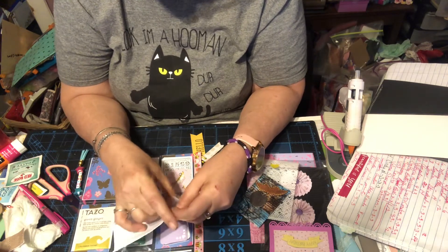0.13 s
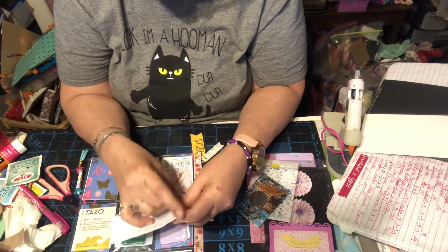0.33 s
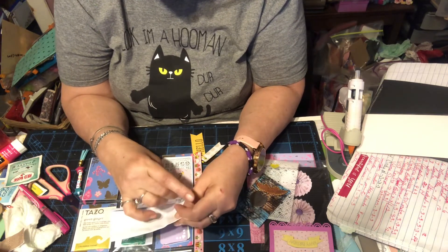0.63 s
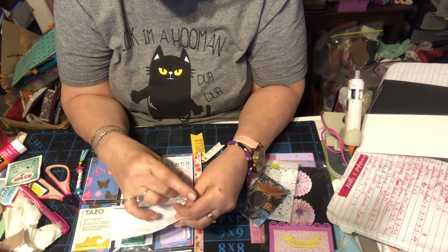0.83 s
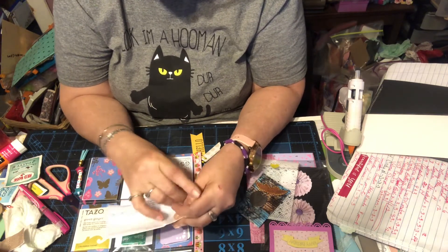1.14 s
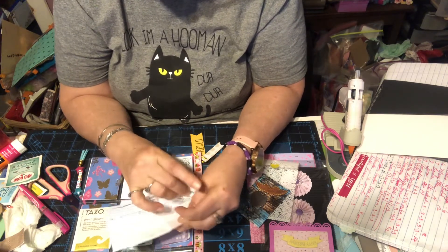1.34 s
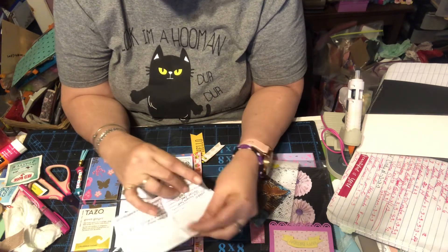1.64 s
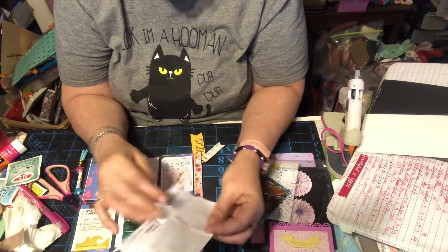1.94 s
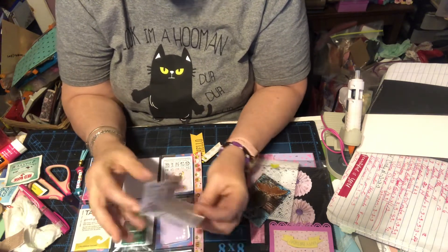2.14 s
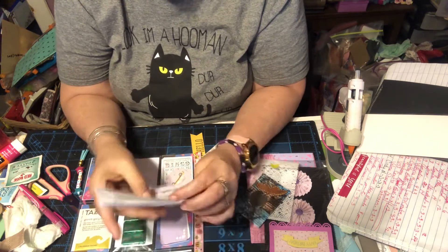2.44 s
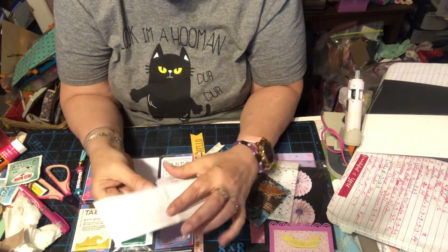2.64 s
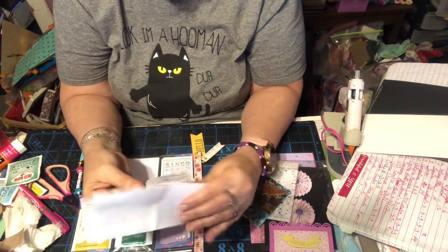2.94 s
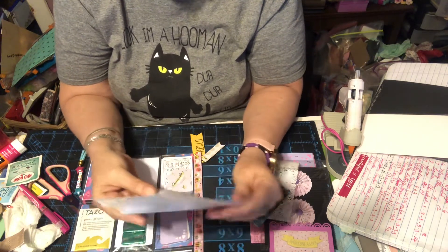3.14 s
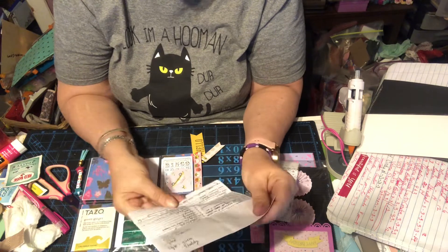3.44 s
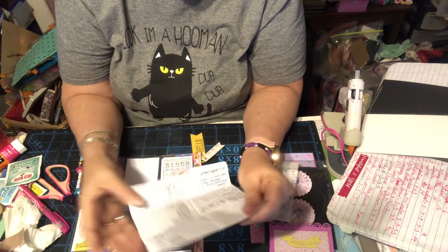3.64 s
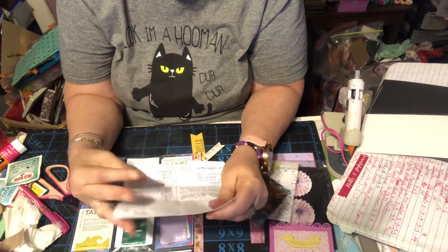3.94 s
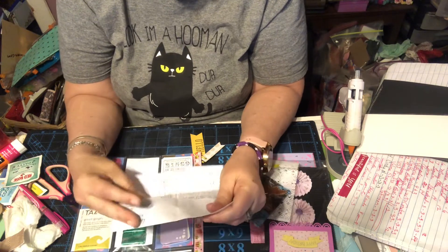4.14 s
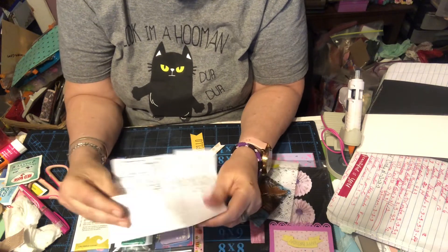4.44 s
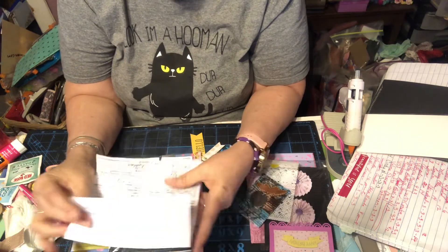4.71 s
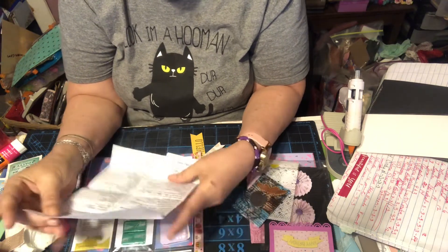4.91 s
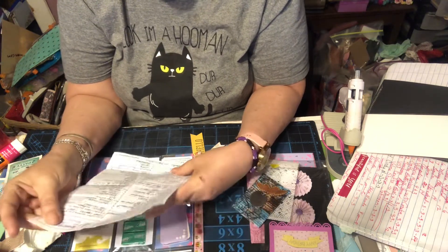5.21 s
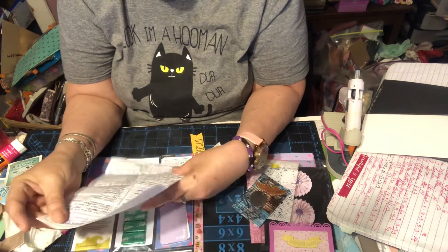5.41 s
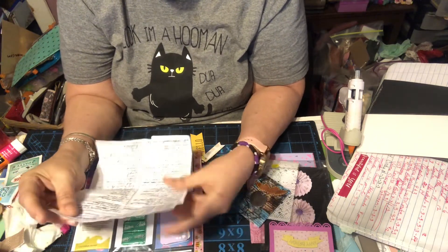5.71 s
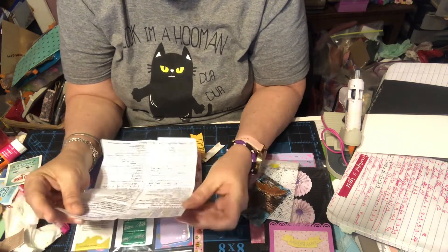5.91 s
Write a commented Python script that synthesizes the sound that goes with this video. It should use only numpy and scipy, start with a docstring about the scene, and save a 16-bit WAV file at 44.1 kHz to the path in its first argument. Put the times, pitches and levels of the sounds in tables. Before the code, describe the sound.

Close to the microphone, hands unfold a sheet of writing paper. Sharp creases snap at once, with isolated clicks, then a dense crackling flurry just after one second. Dry sliding strokes and fine hissy rubbing fill the gaps, pausing briefly before four seconds and resuming until nearly six. The small furnished room is quiet and dry, with soft dark air noise and a very faint distant engine.

```python
"""A folded sheet of writing paper is opened by hand over a craft table in a small furnished room.
From the start creases snap, thickly after 1.3 s: each a pulse and scattered noise ringing a paper panel.
Strokes and light finger rubbing hiss and crackle between snaps: coloured noise in stick-slip bursts.
The rubbing pauses near 3.7 s, then resumes; the last stroke fades just before 6 s.
Throughout, soft noise is the room air; a far engine, two sines and a boom, speeds up to 4.7 s, then eases."""
import sys
import numpy as np
from scipy import signal
from scipy.fft import rfft, irfft, next_fast_len
from scipy.io import wavfile
from scipy.ndimage import uniform_filter1d

SR = 44100
rng = np.random.default_rng(int(sys.argv[2]) if len(sys.argv) > 2 else 0)


def to_wav(s):
    """Save 16-bit WAV."""
    ch = np.atleast_2d(s).T  # columns
    pcm = np.round(np.clip(ch, -1, 1) * 32767)  # PCM
    wavfile.write(sys.argv[1], SR, pcm.astype(np.int16))


N = 267378


def from_db(db):
    """Decibels to gain."""
    return 10 ** (np.asarray(db) / 20)


def rms_one(x):
    """Scale to unit rms."""
    return x / np.sqrt(np.mean(x ** 2) + 1e-20)


def in_time(rows):
    """Interpolate each column after the time column, sample by sample."""
    time_s, *columns = np.transpose(rows)
    return [np.interp(np.arange(N) / SR, time_s, column) for column in columns]


def at_hz(points, hz):
    """Read a table on a log-frequency axis."""
    point_hz, value = np.transpose(points)
    return np.interp(np.log(hz + 1), np.log(point_hz), value)


def coloured(x, spectrum):
    """Filter a steady signal to a spectrum shape; rms 1."""
    size = next_fast_len(N)
    hz = np.fft.rfftfreq(size, 1 / SR)
    shaped = rfft(x, size) * from_db(at_hz(spectrum, hz))
    return rms_one(irfft(shaped, size)[:N])


def drift(rate_hz):
    """Smooth random curve, rms 1, with rate_hz random knots a second."""
    knots = rng.standard_normal(N // 20)
    return rms_one(np.interp(np.arange(N) / SR * rate_hz, np.arange(len(knots)), knots))


def resonate(x, hz, width_hz):
    """Two-pole resonance with gain 1 at its top."""
    r = np.exp(-np.pi * width_hz / SR)
    numerator = np.array([1, 0, -1]) * (1 - r * r) / 2
    denominator = [1, -2 * r * np.cos(2 * np.pi * hz / SR), r * r]
    return signal.lfilter(numerator, denominator, x)


# far engine: time_s, firing_hz, level_db
ENGINE_RUN = [(0, 91.5, -82.5), (1.3, 85.85, -77), (3.5, 94.95, -66.5), (4.15, 93.9, -62),
              (4.7, 125.5, -61.5), (5.15, 121, -65.5), (5.6, 101, -61), (6.06, 89.8, -55.5)]
# engine boom in the room: time_s, level_db
ENGINE_BOOM = [(0, -85), (1.7, -64.5), (3.0, -60.5), (3.8, -58), (5.0, -60.5), (5.6, -66.5)]


def engine(waver=0.017, flutter_db=0.5, first_db=-7.0, boom_hz=146, boom_width_hz=28):
    """Only the two lowest firing orders and a narrow boom get through the walls."""
    firing_hz, level_db = in_time(ENGINE_RUN)
    boom_db, = in_time(ENGINE_BOOM)
    phase = 2 * np.pi * np.cumsum(firing_hz * (1 + waver * drift(20))) / SR
    first = np.sin(phase) * from_db(first_db + flutter_db * drift(22))
    second = np.sin(2 * phase) * from_db(flutter_db * drift(13))
    boom = resonate(rng.standard_normal(N), boom_hz, boom_width_hz)
    boom = resonate(boom, boom_hz, boom_width_hz)
    return from_db(level_db) * rms_one(first + second) + from_db(boom_db) * rms_one(boom)


# still room air, relative density: freq_hz, density_db_per_hz
AIR_SPECTRUM = [(22, -64), (45, -12.5), (90, 2.5), (125, -2.5), (180, 1.5), (450, -8.5), (850, -17.5),
                (1300, -20.5), (2200, -25), (15500, -37.5)]
# narrow resonances of the room air: freq_hz, width_hz, peak_gain_db
AIR_RESONANCES = [(490, 12, 9), (836, 79, 9), (1260, 36, 10)]


def room_air(floor_db=-60):
    """A soft, dark noise floor with a few faint resonances."""
    air = coloured(rng.standard_normal(N), AIR_SPECTRUM)
    resonances = sum((from_db(gain_db) - 1) * resonate(air, hz, width_hz)
                     for hz, width_hz, gain_db in AIR_RESONANCES)
    return from_db(floor_db) * (air + resonances)


# room reverberation: freq_hz, t60_s
ROOM_DECAY = [(200, 0.11), (6000, 0.13), (15000, 0.25)]


def room(x, wet_db=-17.0, full_after_s=0.0065, band_count=8):
    """Diffuse reflections from the clutter: noise bands, each with its own exponential decay."""
    t = np.arange(SR // 2) / SR
    edges_hz = np.geomspace(150, 17000, band_count + 1)
    tail = 0
    for low_hz, high_hz in zip(edges_hz, edges_hz[1:]):
        bandpass = signal.butter(2, [low_hz, high_hz], "band", fs=SR, output="sos")
        band = signal.sosfilt(bandpass, rng.standard_normal(len(t)))
        t60_s = at_hz(ROOM_DECAY, np.sqrt(low_hz * high_hz))
        tail = tail + band * np.exp(-np.log(1000) * t / t60_s)
    # silent for half of full_after_s, then ramps up
    tail = tail * np.clip(2 * t / full_after_s - 1, 0, 1)
    return from_db(wet_db) * signal.fftconvolve(x, tail / np.linalg.norm(tail))[:N]


# light rubbing while the fingers hold and turn the sheet: start_s, end_s, rustle_db, hiss_db
GRIP_RUBS = [(0, 0.71, -66.5, -65.5), (0.97, 2.11, -66.5, -72), (2.23, 2.605, -63, -68.5),
             (2.604, 3.634, -65.5, -64), (3.985, 4.804, -64.5, -66.5), (4.839, 5.763, -63, -64)]
# paper sliding on paper and skin: start_s, length_s, rustle_db, hiss_db
SLIDE_STROKES = [(-0.03, 0.11, -49, -42.5), (0.125, 0.041, -51.5, -51.5), (0.36, 0.11, -51.5, -51),
                 (0.53, 0.12, -64, -55), (0.723, 0.05, -61, -46), (0.802, 0.055, -68.5, -68),
                 (0.86, 0.086, -54, -57), (0.984, 0.11, -52, -50.5), (1.091, 0.048, -54, -59.5),
                 (1.149, 0.038, -58, -54.5), (1.209, 0.12, -55.5, -49), (1.248, 0.13, -45, -41),
                 (1.363, 0.107, -48.5, -53.5), (1.587, 0.35, -54.5, -52.5), (1.912, 0.087, -48, -51),
                 (2.024, 0.04, -53.5, -49), (2.153, 0.023, -55, -59), (2.23, 0.05, -60, -58),
                 (2.272, 0.051, -60, -42), (2.346, 0.045, -51.5, -44), (2.387, 0.051, -49.5, -55.5),
                 (2.472, 0.09, -58, -60.5), (2.618, 0.21, -64, -58.5), (2.774, 0.15, -56.5, -51.5),
                 (2.974, 0.17, -57, -56.5), (3.115, 0.23, -53, -58), (3.218, 0.15, -50.5, -49),
                 (3.412, 0.11, -58.5, -62), (3.995, 0.093, -62.5, -66.5), (4.08, 0.18, -60, -57),
                 (4.208, 0.3, -59, -51), (4.423, 0.15, -51.5, -51.5), (4.561, 0.28, -52.5, -49.5),
                 (4.836, 0.17, -60, -57), (4.95, 0.43, -58, -61), (5.44, 0.15, -51.5, -56.5),
                 (5.464, 0.298, -65.5, -62.5), (5.66, 0.28, -66.5, -72)]


def hand_motion(grip_fade_s=0.03, arch_power=1.1):
    """Rustle and hiss gains: half-sine arched strokes add in power to the light rub of the grip."""
    t = np.arange(N) / SR
    power = np.zeros((2, N))
    for start_s, end_s, rustle_db, hiss_db in GRIP_RUBS:
        held = np.clip(np.minimum(t - start_s, end_s - t) / grip_fade_s, 0, 1)
        power += np.outer(from_db([rustle_db, hiss_db]), held) ** 2
    for start_s, length_s, rustle_db, hiss_db in SLIDE_STROKES:
        during = slice(*np.searchsorted(t, [start_s, start_s + length_s]))
        arch = np.abs(np.sin(np.pi * (t[during] - start_s) / length_s)) ** arch_power
        power[:, during] += np.outer(from_db([rustle_db, hiss_db]), arch) ** 2
    return np.sqrt(power)


def slips(median_per_s, spread_db, die_s, smooth, clump_db):
    """Friction noise: clumps of tiny stick-slip bursts of uneven size over an even rub."""
    sizes = from_db(spread_db * np.minimum(rng.exponential(1, N), 3.0))
    caught = rng.random(N) < median_per_s * from_db(clump_db * drift(30)) / SR
    bursts = (sizes * caught) ** 2 + 1e-18
    power = signal.lfilter([1], [1, -np.exp(-2 / (die_s * SR))], bursts)
    return rng.standard_normal(N) * np.sqrt(smooth + power / power.mean())


def table_echo(x, lag_s=0.0025, sway=0.024, echo_db=-10.0):
    """The table top throws the rustle back; the path changes a little as the sheet moves."""
    n = np.arange(N)
    lag_samples = lag_s * SR * (1 + sway * drift(1.0))
    return from_db(echo_db) * np.interp(n - lag_samples, n, x)


# rustling sheet, relative density: freq_hz, density_db_per_hz
RUSTLE_SPECTRUM = [(150, -9.5), (350, 3.5), (850, 3.5), (1400, 1.5), (3800, -4), (5500, -23), (9000, -58)]
# rubbing fibres, relative density: freq_hz, density_db_per_hz
FIBRE_SPECTRUM = [(1500, -18), (3000, 0.5), (4300, 0.5), (6000, -3.5), (7800, 1), (8800, -7), (10500, -4),
                  (15500, -3.5)]


def sliding(rustle_gain, hiss_gain):
    """Coarse catches shake the whole sheet; the fibres add a fine hiss with tiny ticks."""
    catches = slips(median_per_s=110, spread_db=2.0, die_s=0.003, smooth=0.23, clump_db=5)
    rustle = coloured(catches, RUSTLE_SPECTRUM)
    fine = slips(median_per_s=510, spread_db=3.5, die_s=0.00061, smooth=0.57, clump_db=14.0)
    hiss = coloured(fine, FIBRE_SPECTRUM)
    return rustle_gain * (rustle + table_echo(rustle)) + hiss_gain * hiss


def bending_waves(noise, die_s, rise=.5, pulse=1.4, linger_db=-27, linger_s=0.0045, smooth_bins=162):
    """Spectrum of one buckle: a clean pulse, waves scattered by folds and edges, a weak part that lingers."""
    t = np.arange(len(noise)) / SR
    attack = 1 - np.exp(-t / (rise * die_s))
    decay = np.exp(-t / die_s) + from_db(linger_db) * np.exp(-t / linger_s)
    burst = noise * attack * decay
    burst[round(rise * die_s * SR)] += pulse
    waves = rfft(burst)
    # keep the fine ripple of scattering, even out the energy overall
    return waves / np.sqrt(uniform_filter1d(np.abs(waves) ** 2, size=smooth_bins) + 1e-12)


# a panel that dies away sooner radiates less bass: its low edge rises by a power law
TYPICAL_DIE_S, LOW_EDGE_HZ, LOW_EDGE_LAW = 0.0036, 490, 0.63
PANEL_DB, PANEL_REL_WIDTH = 9, 0.25
PANEL_BUILD_S = 0.00023   # a crack shorter than this hardly rings the panel
# colour shared by all snaps: freq_hz, gain_db
SHEET_COLOUR = [(150, 12), (400, 2.5), (7200, 0), (8800, -1.5), (10500, -1), (15500, 1.5)]


def buckle(noise, die_s, panel_hz, top_hz, travel_s=0.00066):
    """One buckle rings the panel next to it; panels that die away sooner lack bass, blunt creases treble."""
    hz = np.fft.rfftfreq(len(noise), 1 / SR)
    die_s = max(die_s, 1e-4)
    low_hz = LOW_EDGE_HZ * (TYPICAL_DIE_S / die_s) ** LOW_EDGE_LAW
    ring_db = PANEL_DB * (1 - np.exp(-(die_s / PANEL_BUILD_S) ** 2))
    low, top, panel = 1j * hz / low_hz, 1j * hz / top_hz, 1j * hz / panel_hz
    radiation = low * low * low / ((1 + low) * (1 + low + low * low))
    damping = PANEL_REL_WIDTH * panel
    resonance = 1 + (from_db(ring_db) - 1) * damping / (1 + damping + panel * panel)
    # bending waves: delay = travel_s * (sqrt(1000 / hz) - 1), lows last
    dispersion = np.exp(-2j * np.pi * travel_s * (2 * np.sqrt(1000 * hz) - hz))
    colour = from_db(at_hz(SHEET_COLOUR, hz)) * dispersion
    return irfft(bending_waves(noise, die_s) * radiation * resonance * colour / (1 + top) ** 2)


def snaps(rows, size=4096, lead_count=256):
    """Sum one buckle per row: start_s, level_db, die_s, panel_hz, top_hz."""
    out = np.zeros(N + 2 * size)
    noises = rng.standard_normal((len(rows), size))
    for (start_s, level_db, die_s, panel_hz, top_hz), noise in zip(rows, noises):
        at = max(round(start_s * SR), 0)
        # the lead keeps early treble from wrapping to the end
        snap = np.roll(buckle(noise, die_s, panel_hz, top_hz), lead_count)
        out[at:at + size] += from_db(level_db) * snap
    return out[lead_count:lead_count + N]


TICKS_PER_S, TICK_OVER_RUSTLE_DB, TICK_SPREAD_DB = 22, 26, 0.5
TICK_DIE_S, TICK_PANEL_HZ, TICK_TOP_HZ = 0.002, 2000, 5500   # medians


def small_creases(push, spread_octaves=0.5, count=1200):
    """Random weak buckles from a stock of creases: the push on the sheet sets their chance and strength."""
    at, chance = rng.integers(0, N, count), rng.random(count)
    own = rng.standard_normal((count, 4))
    rate_per_s = TICKS_PER_S * push[at] / push.mean()
    push_db = 20 * np.log10(push[at] + 1e-9)
    level_db = push_db + TICK_OVER_RUSTLE_DB + TICK_SPREAD_DB * own[:, 0]
    shapes = np.array([TICK_DIE_S, TICK_PANEL_HZ, TICK_TOP_HZ]) * 2 ** (spread_octaves * own[:, 1:])
    rows = np.column_stack([at / SR, level_db, shapes])
    return snaps(rows[chance < rate_per_s * N / SR / count])


# creases snapping at set times, from loud cracks to tiny ticks:
# start_s, level_db, die_s, panel_hz, top_hz
TIMED_CREASES = [(0.017, -5.5, 0.0023, 4920, 16000), (0.031, -6, 0.0024, 1056, 3370),
                 (0.044, -3, 0.0036, 1990, 6300), (0.1453, -9, 0.004, 2200, 3070),
                 (0.2259, -13, 0.0042, 2500, 1800), (0.309, -20, 0.0033, 1450, 2570),
                 (0.3671, 6.5, 0.00093, 2080, 7260), (0.4061, -14, 0.0028, 1570, 9600),
                 (0.4826, -6, 0.0042, 1128, 6400), (0.5406, -21.5, 0.0012, 3400, 18100),
                 (0.5726, -29, 0.00075, 3080, 18000), (0.5854, -20, 0.0016, 4100, 18700),
                 (0.6046, -18, 0.0026, 3400, 11740), (0.6227, -16, 0.0007, 2520, 17900),
                 (0.7447, 12, 0.00043, 1304, 7400), (0.9887, -7.5, 0.0012, 1460, 1820),
                 (1.0293, -14.5, 0.0013, 1740, 3780), (1.058, -17.5, 0.0055, 1900, 2790),
                 (1.265, -7.5, 0.0065, 1802, 13800), (1.3009, 7, 0.002, 1710, 9500),
                 (1.319, -2.5, 0.0017, 1480, 6400), (1.3267, -10, 0.0016, 2950, 10800),
                 (1.3315, 0, 0.0051, 2826, 8260), (1.3408, -1.5, 0.0025, 2120, 9200),
                 (1.352, -5.5, 0.0051, 490, 16000), (1.3643, -6, 0.0035, 1220, 3400),
                 (1.3814, -8, 0.0015, 4100, 8300), (1.3959, -10, 0.0031, 1700, 4200),
                 (1.4062, -10, 0.0072, 3100, 12200), (1.4258, -5.5, 0.0029, 2860, 9000),
                 (1.441, -5, 0.0014, 760, 5540), (1.4633, -7.5, 0.00211, 4170, 5700),
                 (1.5316, -6.5, 0.0017, 1590, 4900), (1.6253, -13.5, 0.0034, 1015, 3740),
                 (1.7273, -15.5, 0.0018, 6980, 16000), (1.7439, -8, 0.0013, 1410, 3770),
                 (1.808, -8.5, 0.0031, 1430, 2195), (1.8146, -4, 0.0028, 1260, 2600),
                 (1.8228, -11, 0.0025, 830, 10900), (1.8327, -2, 0.0039, 435, 5000),
                 (1.937, 2.5, 0.0025, 2950, 2170), (1.949, -22, 0.0046, 900, 2480),
                 (1.9706, -15, 0.0089, 1100, 2940), (1.9913, -6.5, 0.008, 3300, 2200),
                 (2.24, -26.5, 0.0036, 3600, 12040), (2.4323, -6.5, 0.0057, 1372, 1676),
                 (2.45, -18, 0.0025, 1200, 1980), (2.4986, -17.5, 0.0027, 1290, 3800),
                 (2.5131, -15.5, 0.0025, 2450, 4380), (2.533, -14.5, 0.004, 1290, 2600),
                 (2.6061, -8, 0.0016, 2730, 2400), (2.6378, -12.5, 0.0098, 804, 2310),
                 (2.875, -11, 0.0073, 896, 4180), (2.9877, -1, 0.0029, 472, 2430),
                 (3.0786, 4, 0.0023, 6450, 4580), (3.2131, -10, 0.0035, 736, 3010),
                 (3.2285, -4.5, 0.0042, 774, 3340), (3.2453, -13.5, 0.0081, 889, 3400),
                 (3.2859, 2.5, 0.0034, 756, 4200), (3.2947, -1.5, 0.0041, 1130, 2600),
                 (3.4894, -0.5, 0.0033, 2400, 11500), (3.5448, -6.5, 0.0027, 3760, 4830),
                 (3.55, -4, 0.0066, 350, 3160), (3.5954, -16.5, 0.0051, 450, 5600),
                 (4.0007, -27, 0.002, 2970, 7000), (4.1124, -2.5, 0.005, 2134, 1600),
                 (4.1633, -10, 0.0067, 724, 2400), (4.177, 4, 0.0024, 3270, 5160),
                 (4.4417, -9, 0.0066, 3430, 18000), (4.459, 6, 0.0037, 4840, 2710),
                 (4.4748, -3.5, 0.0069, 977, 2110), (4.5398, -7, 0.0013, 2860, 3200),
                 (4.6635, -5, 0.0027, 1060, 2290), (4.6785, 0, 0.0033, 2800, 2586),
                 (4.7422, -1.5, 0.0038, 2420, 8000), (4.7466, -3, 0.00513, 2000, 3310),
                 (4.757, -3, 0.0077, 473, 2380), (4.832, -19, 0.0042, 1300, 1800),
                 (4.9149, 6, 0.00092, 1610, 2670), (4.959, -19.5, 0.0031, 700, 5930),
                 (5.073, -7.5, 0.0046, 1500, 3870), (5.1479, -8.5, 0.0027, 3550, 7120),
                 (5.2367, -4.5, 0.0054, 1127, 2290), (5.442, -14, 0.0031, 3630, 5050),
                 (5.4477, -2.5, 0.0014, 6960, 8000), (5.4605, -3, 0.0038, 7400, 4460),
                 (5.5062, -10, 0.0022, 3240, 4440), (5.6665, -5, 0.0091, 883, 1900),
                 (5.763, -7.5, 0.0084, 946, 1720), (5.878, -17, 0.005, 1250, 1193)]


def timed_creases():
    """Creases snap over at set times, each ringing its own panel."""
    return snaps(TIMED_CREASES)


def scene():
    """The quiet background, the sheet close by and its reflections."""
    background = engine() + room_air()
    rustle_gain, hiss_gain = hand_motion()
    paper = timed_creases() + sliding(rustle_gain, hiss_gain) + small_creases(rustle_gain)
    return (paper + room(paper) + background)[None]


def record(dry, cutoff_hz=16000):
    """A steep elliptic low-pass cuts the top."""
    lowpass = signal.ellip(10, .1, 80, cutoff_hz, fs=SR, output="sos")
    return signal.sosfilt(lowpass, dry)


dry = scene()
out = record(dry)
to_wav(out)
```